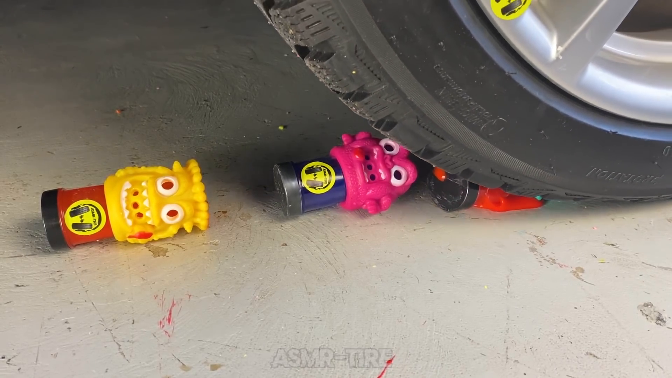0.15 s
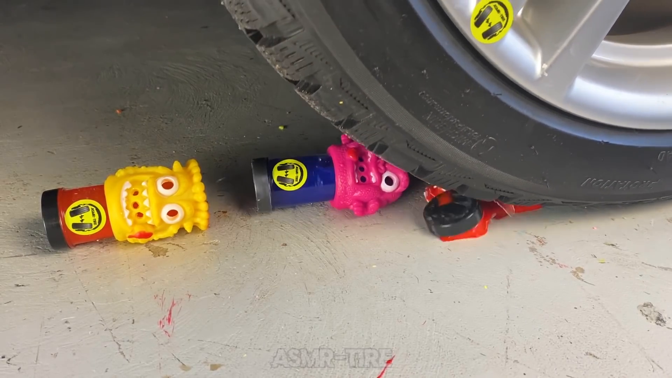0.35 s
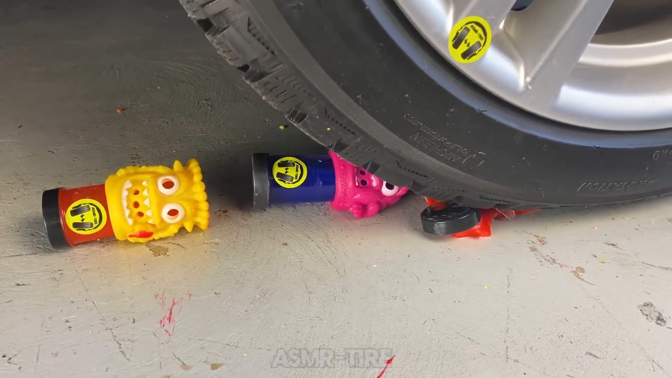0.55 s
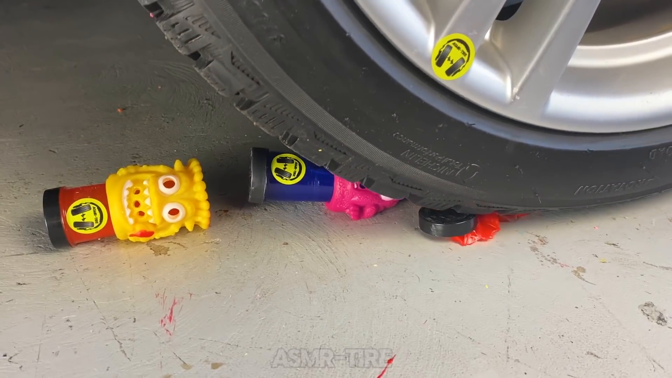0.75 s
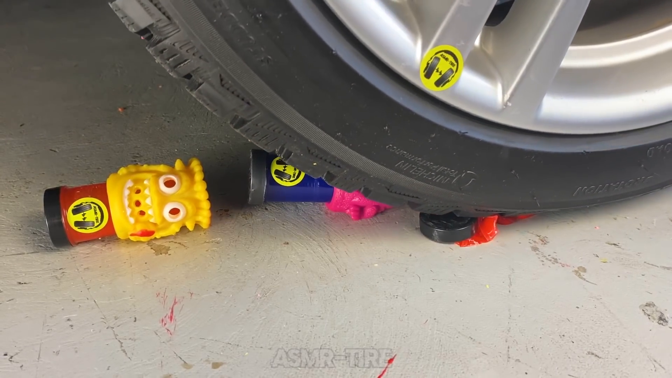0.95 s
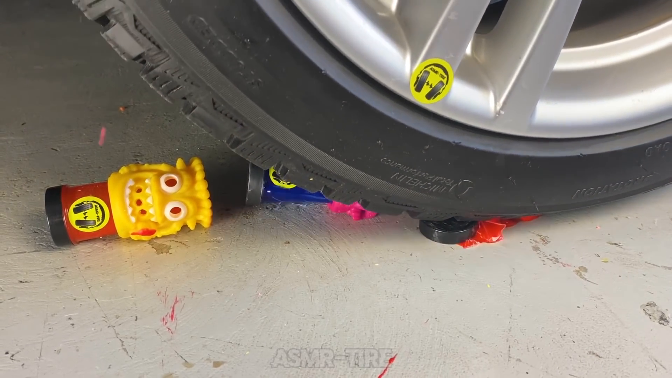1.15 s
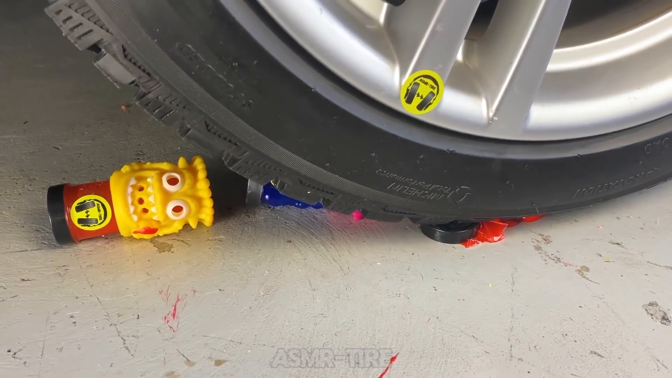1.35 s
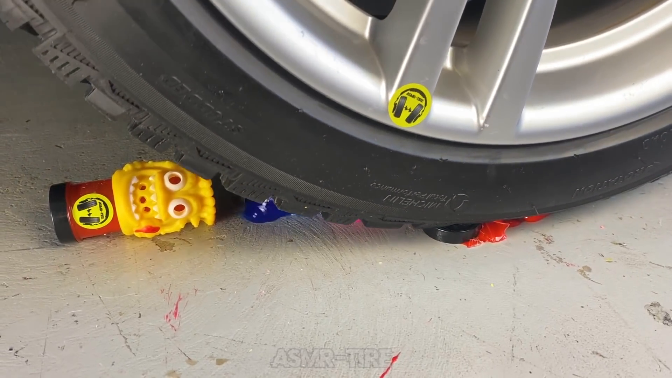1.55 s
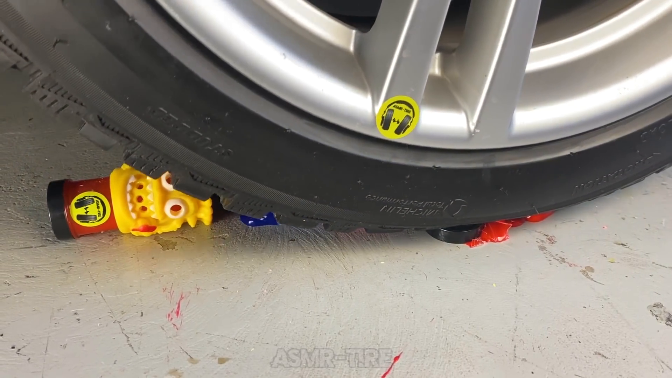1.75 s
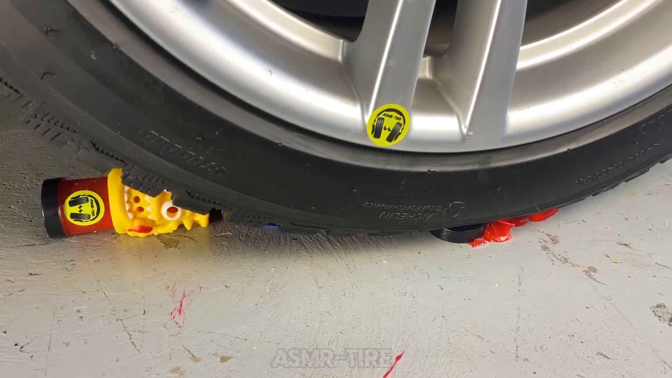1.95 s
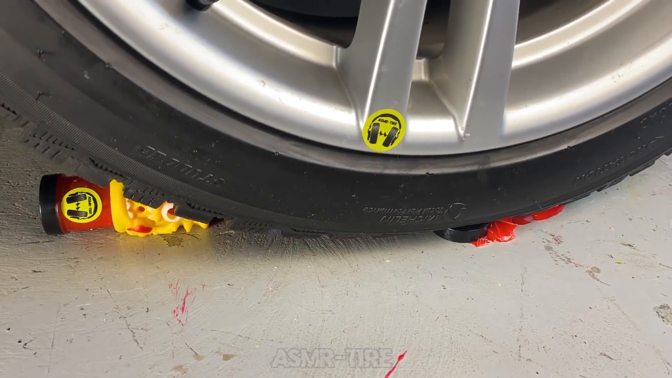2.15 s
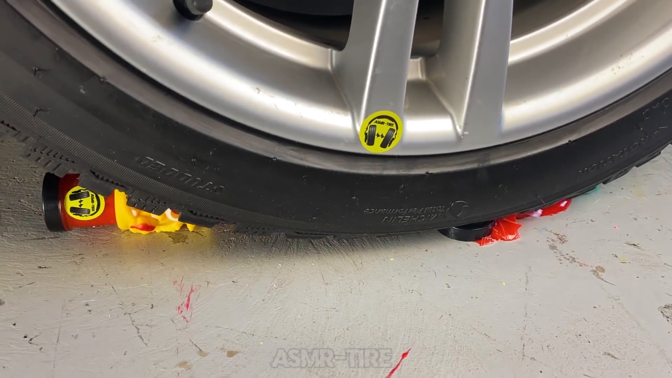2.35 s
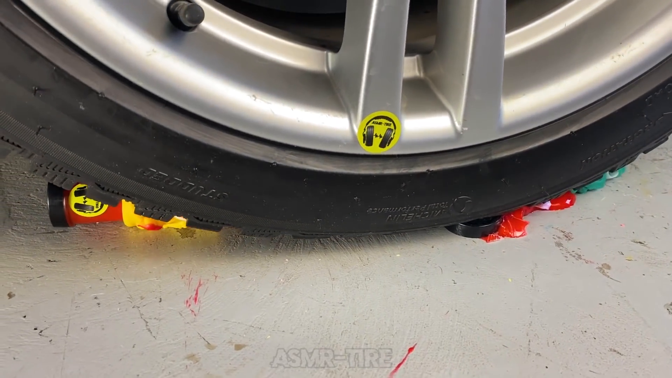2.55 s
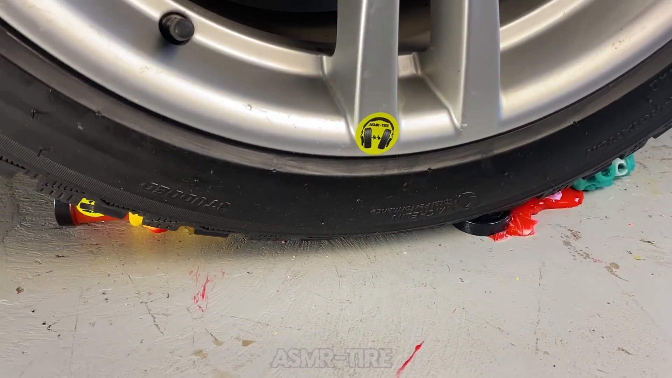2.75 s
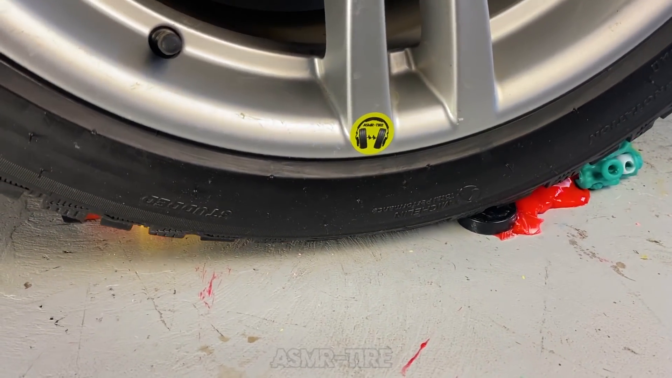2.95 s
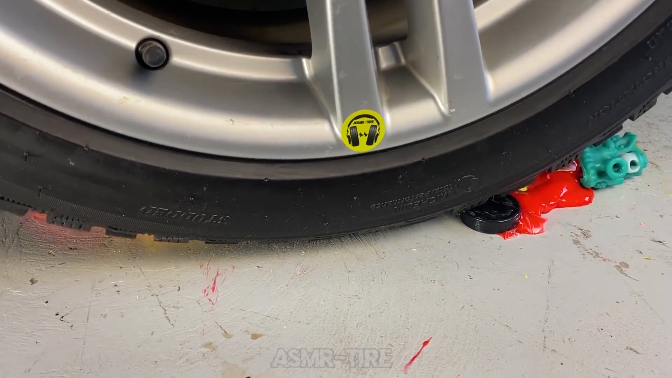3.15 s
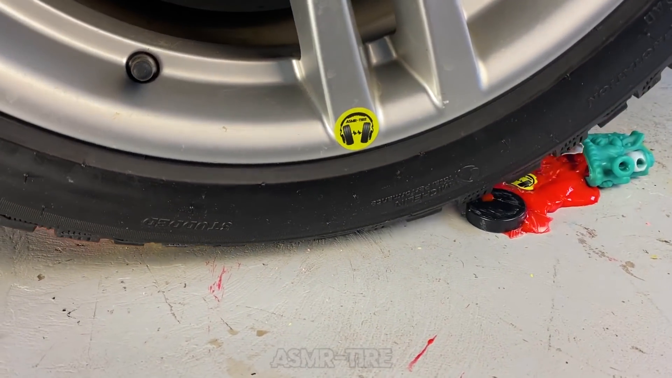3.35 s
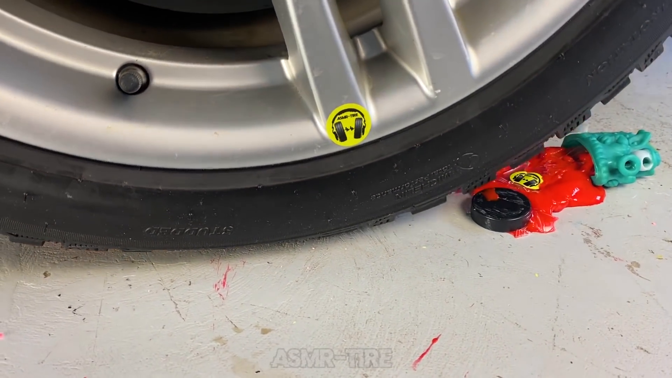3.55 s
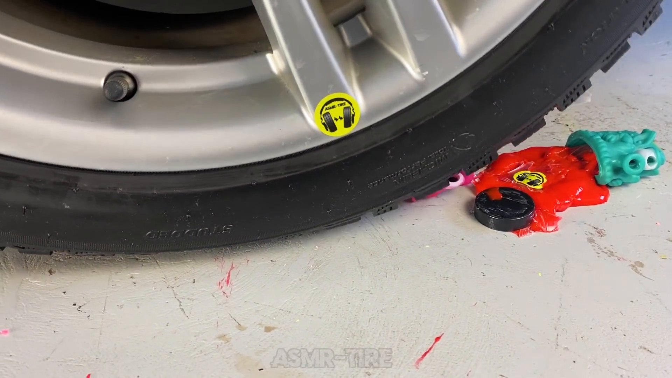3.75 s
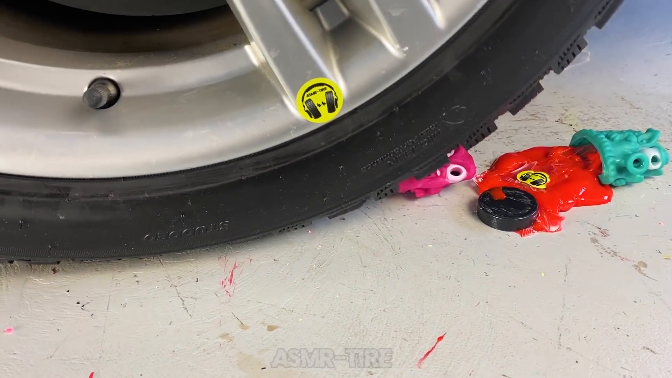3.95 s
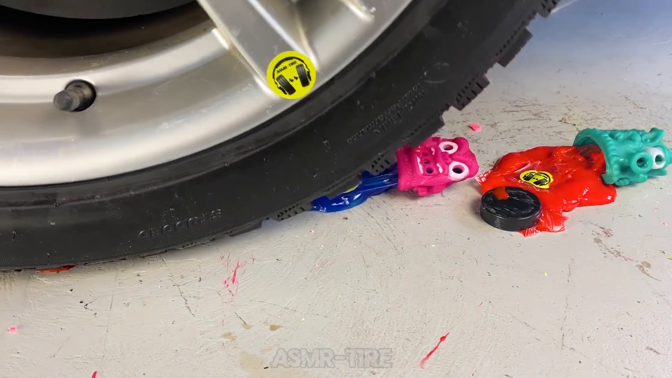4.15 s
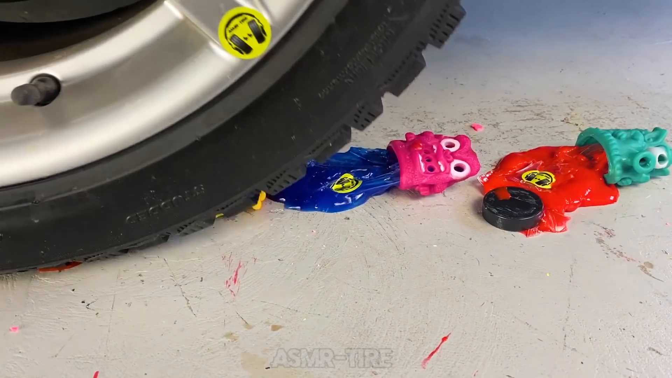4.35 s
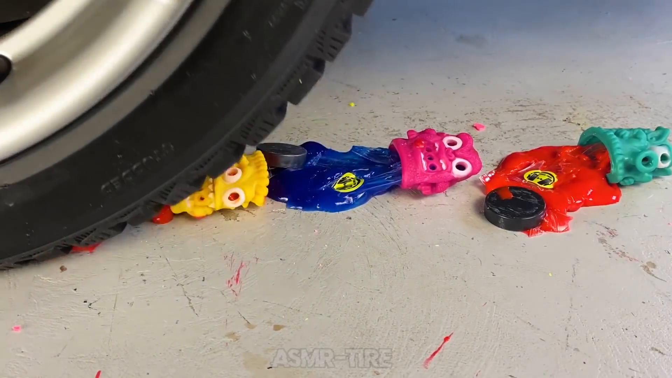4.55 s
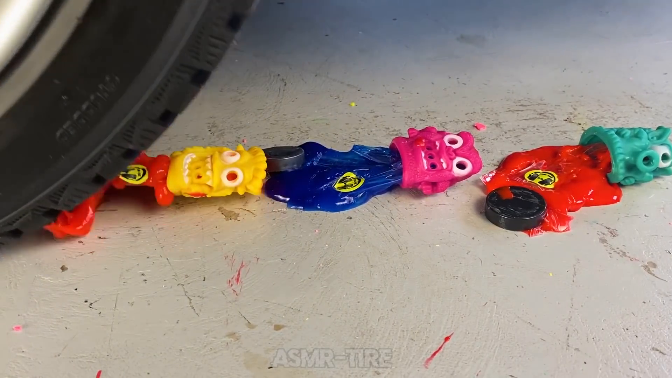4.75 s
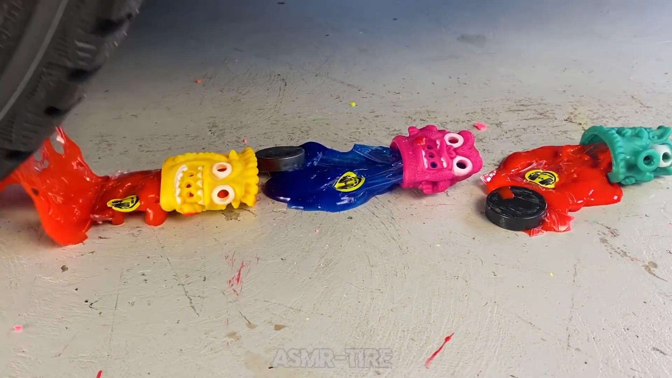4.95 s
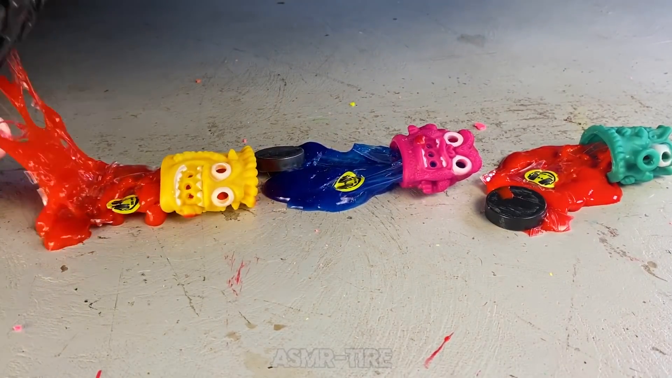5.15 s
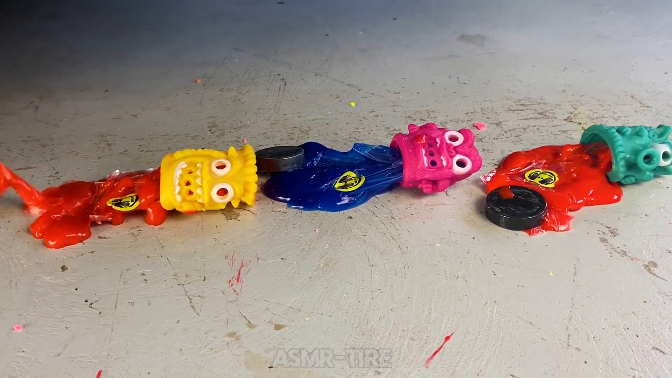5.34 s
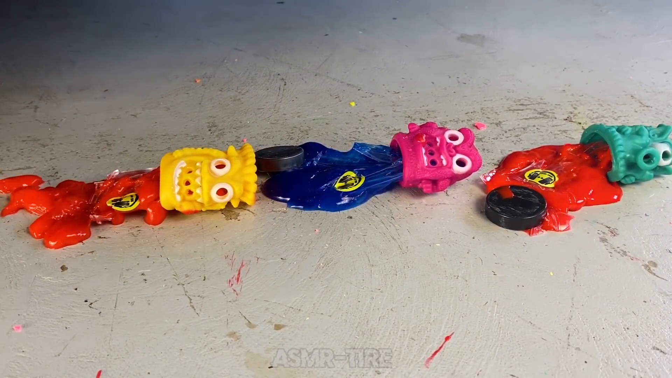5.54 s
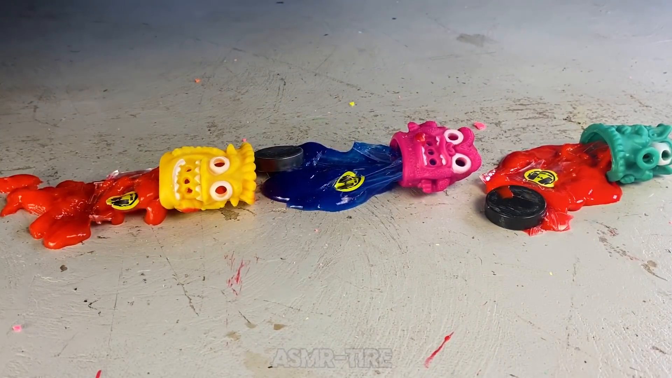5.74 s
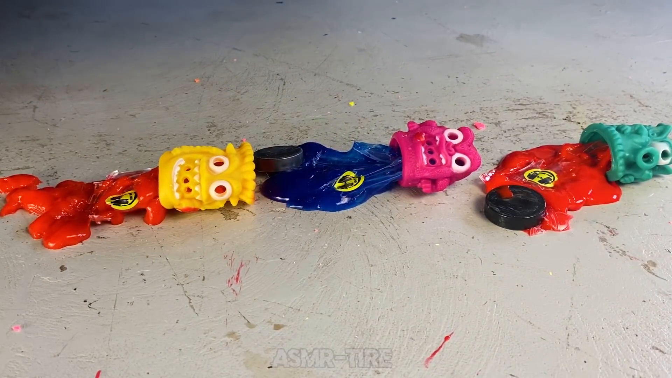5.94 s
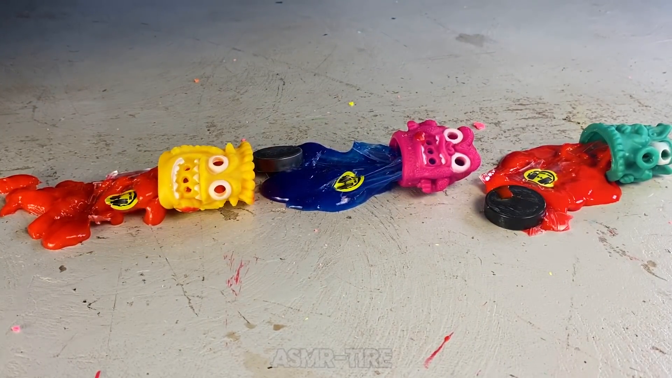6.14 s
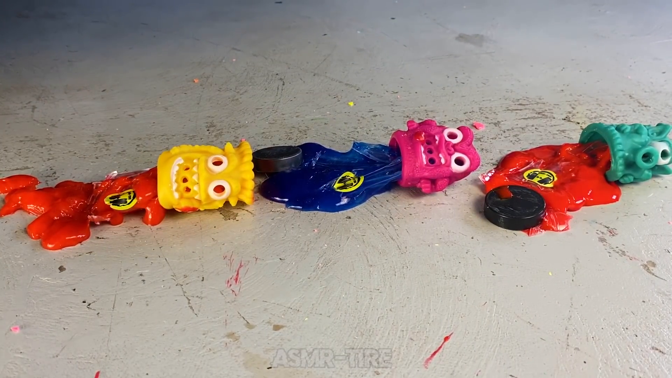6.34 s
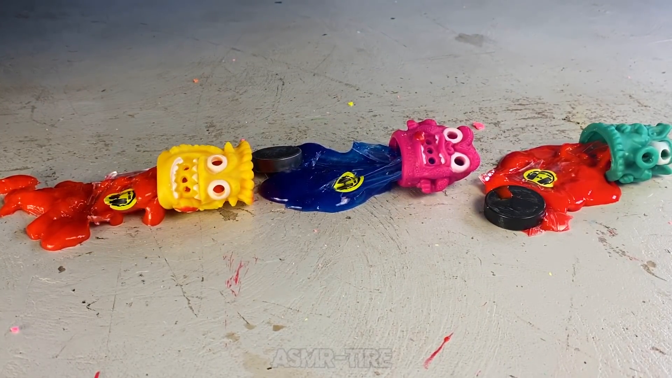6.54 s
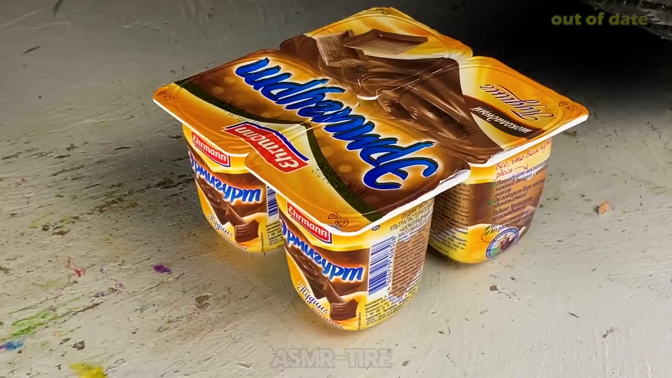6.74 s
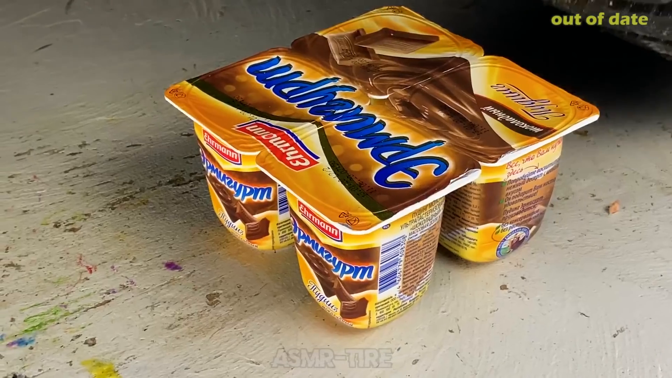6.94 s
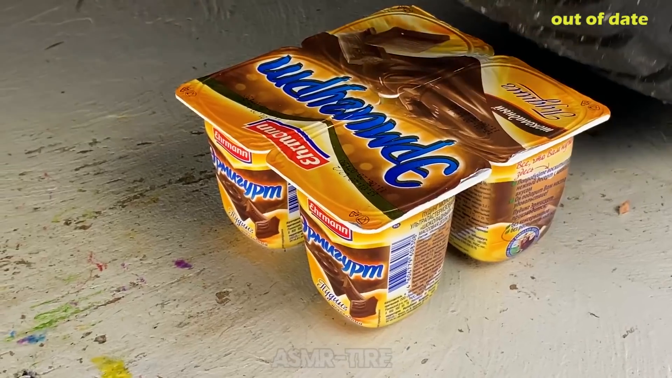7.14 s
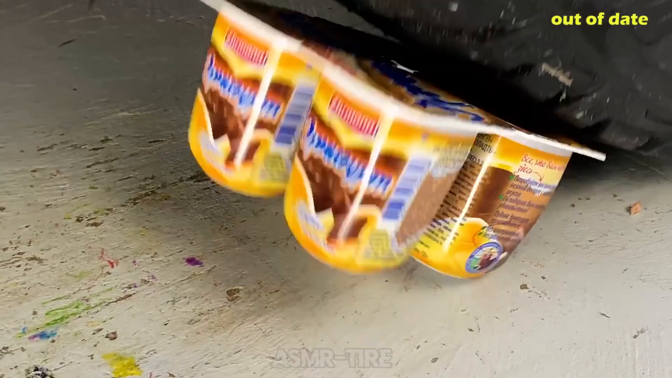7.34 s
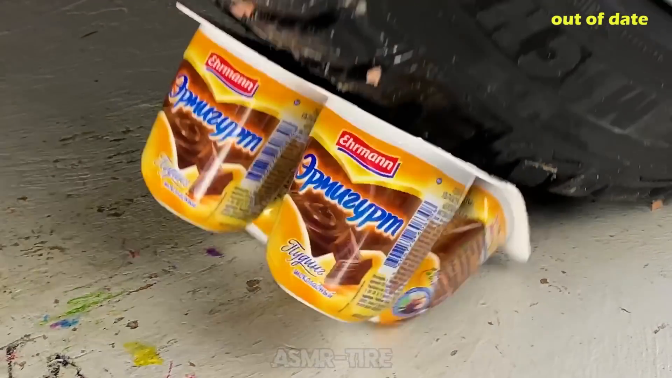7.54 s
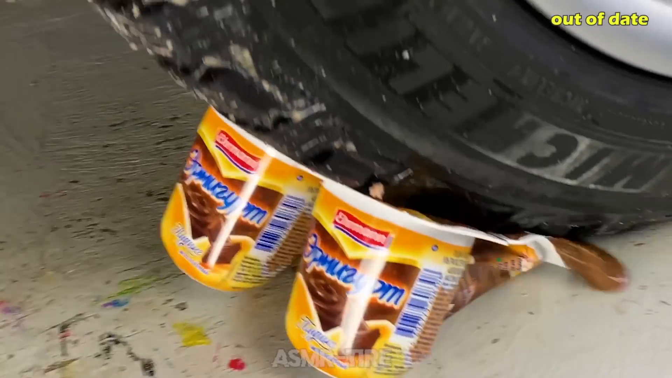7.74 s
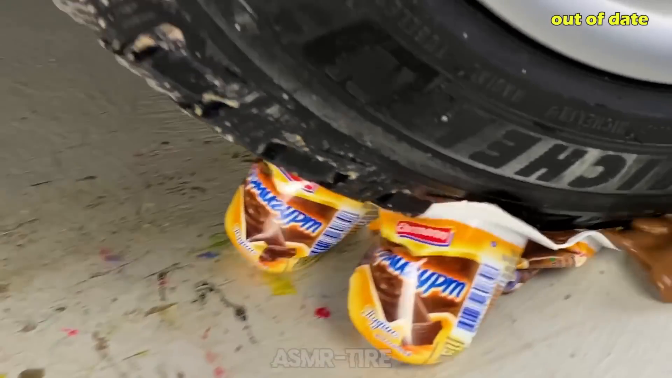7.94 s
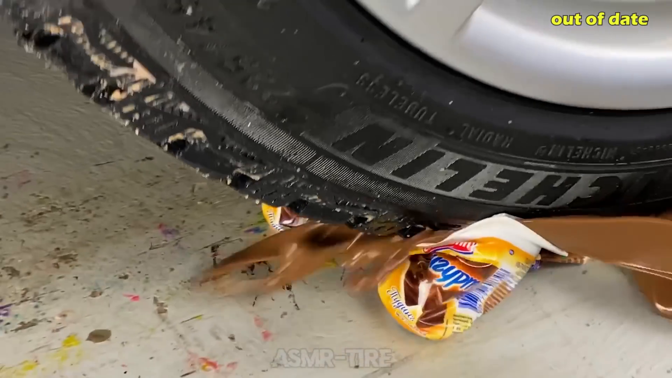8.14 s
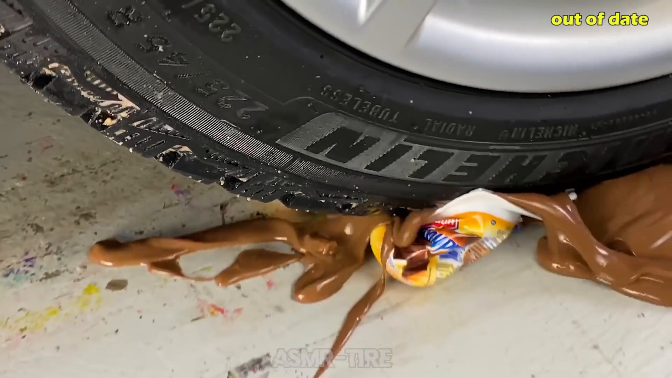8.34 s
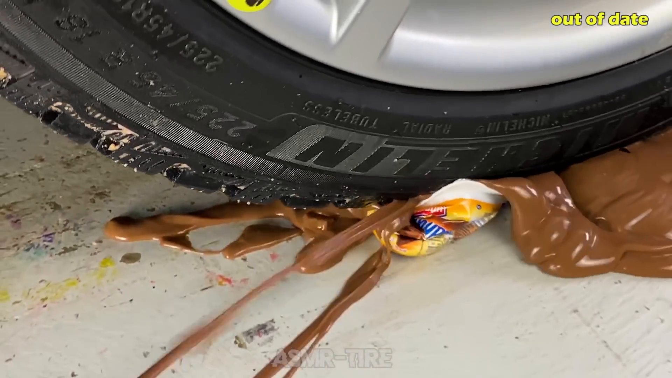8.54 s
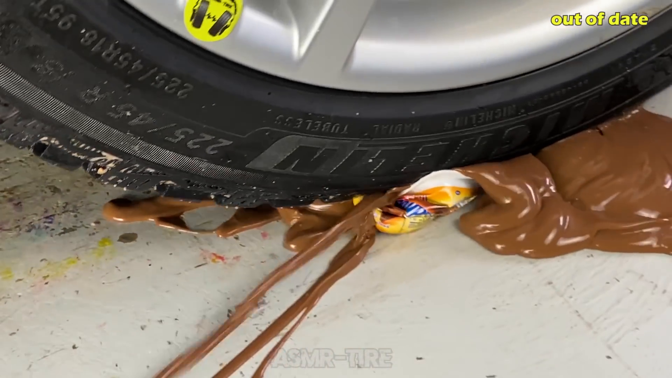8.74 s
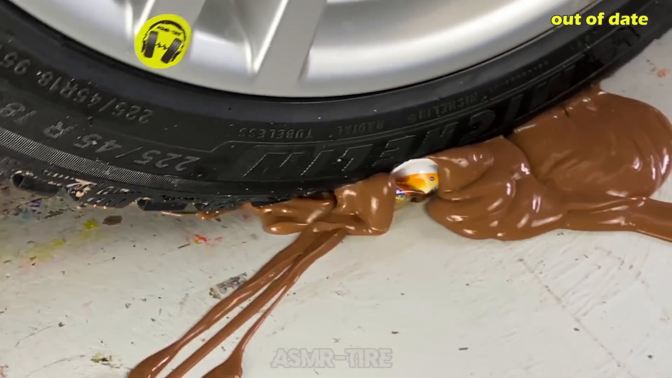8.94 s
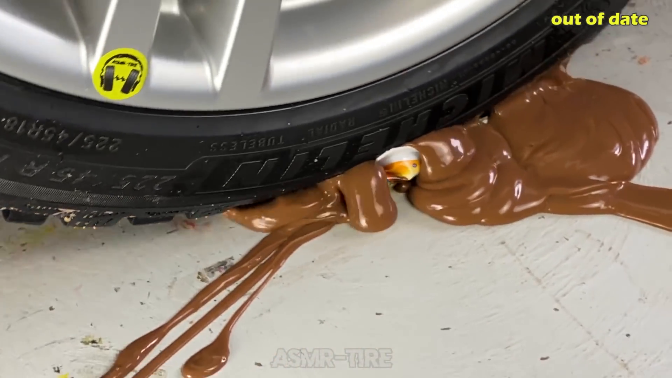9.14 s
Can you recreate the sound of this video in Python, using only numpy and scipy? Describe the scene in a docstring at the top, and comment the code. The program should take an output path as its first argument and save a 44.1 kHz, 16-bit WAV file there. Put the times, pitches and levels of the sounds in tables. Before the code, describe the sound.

A car engine idles with a low rumble and hum throughout, in a garage with a short echo. From the start, a tyre crushes hollow plastic toys close to the microphone: dense, irregular sharp cracks, splintering snaps and small hollow thumps, with brief rubbery groans near 1.1 and 3.9 seconds. The cracking thins after 4 seconds and ends in faint ticks by about 5.4, leaving the quiet engine. A soft low bump and two tiny squeaks come at 6.4 seconds. At 6.8 the engine is suddenly louder. From 7.3 seconds pudding cups crack and crinkle under the tyre, bursting with a loud pop at 7.7, when the engine drops back. More pops and the strongest wet squirt of cream follow around 8 seconds. The squirting fades into small spitting ticks by 8.8, and the engine idles softly until the end at about 9.3 seconds.

```python
"""Tyre crushing toys and pudding cups.

A car creeps over hollow plastic toys on a garage floor, then, from about 6.8 s, over pudding cups. Shells tear
and ping, hollows thump, the air in the tyre hums, cream squirts through a narrowing gap. The engine idles
behind; after the hardest bursts the whole background dips briefly and recovers."""
import sys
import numpy as np
from scipy import signal
from scipy.fft import rfft, irfft, next_fast_len
from scipy.io import wavfile
from scipy.ndimage import uniform_filter1d

SR = 44100
rng = np.random.default_rng(int(sys.argv[2]) if len(sys.argv) > 2 else 0)


def unload_audio(sound):
    """Save the sound as a 16-bit wav file, at the path given as the first command line argument."""
    columns = np.transpose(np.atleast_2d(sound))
    # keep every value between -1 and 1, then stretch to whole-number steps
    steps = np.round(np.clip(columns, -1, 1) * 32767)
    wavfile.write(sys.argv[1], SR, steps.astype(np.int16))


N = 409688
TIME_S = np.arange(N) / SR
EVENT_S = TIME_S[:SR // 14]
CUPS_START_S = 6.77


def undb(db):
    return 10 ** (np.asarray(db) / 20)


def band(x, lo_hz, hi_hz, order=2):
    return signal.sosfilt(signal.butter(order, [lo_hz, hi_hz], "band", fs=SR, output="sos"), x)


def noise_band(lo_hz, hi_hz, order=2):
    return band(rng.standard_normal(N), lo_hz, hi_hz, order)


def unit_rms(x):
    return x / np.sqrt(np.mean(x ** 2))


def unit_peak(x):
    return x / np.max(np.abs(x))


def fade(t, t60):
    """Exponential decay from t = 0, silent before."""
    return np.exp(-np.log(1000) * np.maximum(t, 0) / t60) * (t >= 0)


def arch(start_s, length_s):
    return np.clip(1 - (2 * (TIME_S - start_s) / length_s - 1) ** 2, 0, 1)


def wander(rate_hz):
    """Smoothed random steps, spread near 1."""
    hold = int(SR / rate_hz)
    steps = np.repeat(rng.standard_normal(N // hold + 1), hold)
    return uniform_filter1d(uniform_filter1d(steps, hold), hold)[:N]


def curves(table, outside=None):
    """One interpolated curve for each column after the time."""
    times_s, *columns = np.transpose(table)
    return [np.interp(TIME_S, times_s, column, left=outside, right=outside) for column in columns]


def add_at(out, start_s, sound):
    start = int(start_s * SR)
    out[start:start + len(sound)] += sound


def grains(per_s, centre_hz, spread_octaves, decay_cycles, scatter_db):
    """Short damped rings at random moments, scattered in pitch; rms 1."""
    when, pitch, strength = rng.random((int(per_s * N / SR), 3)).T
    starts, t = (when * N).astype(int), TIME_S[:SR // 100]
    hz = centre_hz[starts] * 2 ** (spread_octaves * (2 * pitch - 1))
    cycles = hz[:, None] * t
    gains = undb(-scatter_db * np.log(1 - strength))
    rings = gains[:, None] * np.sin(2 * np.pi * cycles) * np.exp(-cycles / decay_cycles)
    samples = starts[:, None] + np.arange(len(t))
    return unit_rms(np.bincount(samples.ravel(), rings.ravel())[:N])


# Each row: centre in Hz, relative level in dB, t60 in seconds.
GARAGE_BANDS = [(517, -35, 0.066), (1410, -28, 0.079), (4050, -22.5, 0.069), (9550, -26, 0.1)]
def garage_tail(dry):
    """Floor, car body and walls return a short diffuse tail that changes as the tyre rolls on."""
    block = SR // 5
    count = N // block + 1
    tails = np.zeros((count, block))
    for hz, db, t60 in GARAGE_BANDS:
        noise = unit_rms(band(rng.standard_normal((count, block)), hz / 1.91, hz * 2.2))
        tails += undb(db + 9) * fade(TIME_S[:block] - 0.002, t60) * noise / np.sqrt(t60 * SR / 14)
    blocks = np.pad(dry, (0, count * block - N)).reshape(count, block)
    wet = signal.fftconvolve(blocks, np.pad(tails, ((0, 0), (0, 1))), axes=1)
    return (wet[:, :block].ravel() + np.roll(wet[:, block:].ravel(), block))[:N]


# Each row: start in seconds, depth in dB, recovery time in seconds.
LEVEL_DIPS = [(0.291, 7.5, 0.24), (7.276, 6, 0.15), (7.691, 12, 0.053), (8.065, 5, 0.18)]
def dip_gain(fall_s=0.0043):
    """After the hardest bursts the level falls quickly and returns slowly."""
    dip_db = np.zeros(N)
    for start_s, depth_db, recovery_s in LEVEL_DIPS:
        age_s = np.maximum(TIME_S - start_s, 0)
        dip_db += depth_db * np.minimum(age_s / fall_s, 1) * np.exp(-(age_s / recovery_s) ** 2)
    return undb(-dip_db)


# Each row: multiple of the firing rate, relative level in dB with toys, with cups.
FIRING_HARMONICS = [(1, -6.5, -20), (2, -4.5, 2), (3, 1, -2.5), (4, 3.5, 2), (5, -2.5, -15),
                    (7, -20, -14.5), (9, -23.5, -9.5), (12, -16, -22)]
def engine_idle(firings):
    """Harmonics of the firing rate, each wavering slightly in level."""
    tones = np.zeros(N)
    for multiple, toys_db, cups_db in FIRING_HARMONICS:
        level_db = np.where(TIME_S < CUPS_START_S, toys_db, cups_db) + 1.8 * wander(6.4)
        tones += undb(level_db) * np.sin(2 * np.pi * (multiple * firings + rng.random()))
    return unit_rms(tones)


# Each row: frequency in Hz, relative spectral density in dB.
ROAR_SPECTRUM = [(150, -8), (250, -3.5), (291, -12.5), (398, -25), (434, -11), (1300, -14), (1830, -16),
                 (2710, -17), (3890, -22.5), (5000, -26), (6500, -53.5), (11000, -120)]
def engine_roar():
    """Broad engine bay noise with the whirr of belt and fan."""
    hz, db = np.transpose(ROAR_SPECTRUM)
    size = next_fast_len(N)
    bins_hz = np.maximum(np.arange(size // 2 + 1) * SR / size, 1)
    shape = undb(np.interp(np.log(bins_hz), np.log(hz), db, left=-90, right=-90))
    roar = unit_rms(irfft(rfft(rng.standard_normal(size)) * shape, size)[:N])
    whirr = band(roar, 1750, 2160, order=1)
    return roar + 1.2 * whirr


def tyre_air(hz=215.8, width_hz=16):
    """The engine keeps the air in the tyre humming near one note."""
    noise = unit_rms(noise_band(hz - width_hz / 2, hz + width_hz / 2, order=1))
    return unit_rms(noise + 2.1 * np.sin(2 * np.pi * hz * TIME_S + 1.2 * wander(12)))


def grit(per_s=250):
    """Grit and splinters tick under the tread."""
    impulses = (rng.random(N) < per_s / SR) * rng.standard_normal(N)
    impulses *= undb(3 * np.minimum(rng.exponential(size=N), 4))
    puff = rng.standard_normal(SR // 100) * fade(TIME_S[:SR // 100], t60=0.0053)
    return unit_rms(band(signal.fftconvolve(impulses, puff)[:N], 1300, 8000, order=1))


# Each row: start in seconds, length in seconds, hum level in dB, roar gain in dB.
TREAD_GRINDS = [(0.45, 0.28, -37.5, 8), (1.23, 0.092, -39, 4.5), (2.06, 0.21, -49, 5),
                (2.494, 0.28, -41.5, 1), (3.197, 0.27, -41.5, -1.5), (3.477, 0.2, -48, 0.5),
                (7.02, 0.15, -39.5, 1.5)]
def tread_grinds(rise_s=0.036, t60=0.45):
    """The grinding tread sets the tyre air humming and shifts the level of the roar."""
    hum_gain, roar_gain_db = np.zeros((2, N))
    for start_s, length_s, hum_db, gain_db in TREAD_GRINDS:
        age_s = TIME_S - start_s
        envelope = np.clip(age_s / rise_s, 0, 1) * fade(np.maximum(age_s - length_s, 0), t60)
        hum_gain += undb(hum_db) * envelope
        roar_gain_db += gain_db * envelope
    return hum_gain, roar_gain_db


# Each row: time in seconds, firing rate in Hz.
FIRING_RATE = [(0, 23.76), (6.765, 23.84), (6.775, 25.48), (9.29, 25.81)]
# Each row: time in seconds, then idle, rumble, roar and hiss levels in dB.
CAR_LEVELS = [(0.0, -48, -45.5, -50, -75), (0.26, -42.5, -39, -38.5, -52.5),
              (0.75, -38.5, -43, -51.5, -62.5), (1.15, -53.5, -42, -46.5, -59),
              (2.1, -49, -47.5, -51, -59.5), (2.4, -46.5, -53.5, -53, -70), (2.6, -49.5, -52, -44, -60.5),
              (3.4, -50.5, -52, -43.5, -58.5), (4.0, -49, -49, -48.5, -66), (4.5, -47, -52, -54, -72.5),
              (4.7, -46, -54.5, -60.5, -76.5), (6.3, -46.5, -53.5, -65.5, -100),
              (6.763, -43, -50, -63.5, -88.5), (6.772, -32, -35, -49, -63.5),
              (7.25, -35, -36, -45.5, -57.5), (7.45, -26, -32, -41.5, -55), (7.691, -27.5, -35, -42, -47),
              (7.705, -52, -63, -78, -73), (8.0, -51, -66, -47, -49.5), (8.3, -43.5, -49, -52, -60.5),
              (9.1, -44, -50.5, -63, -81), (9.29, -42.5, -51, -58, -61.5)]
def car():
    """The idling car rolls on, shaking body and floor; valves and exhaust pulse once a firing."""
    idle_db, rumble_db, roar_db, hiss_db = curves(CAR_LEVELS)
    firing_hz, = curves(FIRING_RATE)
    grind_hum, grind_db = tread_grinds()
    firings = np.cumsum(firing_hz * (1 + 0.0067 * wander(3.2))) / SR
    idle = undb(idle_db) * engine_idle(firings)
    rumble = undb(rumble_db + 2.9 * wander(16)) * unit_rms(noise_band(64, 125, order=1))
    roar = engine_roar()
    hiss = unit_rms(noise_band(6000, 15000, order=1) + 0.77 * noise_band(3700, 7000))
    steady_hum = undb(rumble_db + np.where(TIME_S < CUPS_START_S, -6, -11))
    hum = (steady_hum + grind_hum) * tyre_air()
    roar *= undb(roar_db + grind_db + 2 * wander(30))
    hiss *= undb(hiss_db + 3.2 * wander(37))
    throb = 1 + 0.21 * np.sin(2 * np.pi * firings)
    return idle + rumble + throb * (roar + hiss) + hum + undb(hiss_db - 1) * grit()


def rocking_bump(start_s=6.375, level_db=-36, start_hz=98.3):
    """The car rocks with a soft low bump that sinks in pitch."""
    age_s = np.maximum(TIME_S - start_s, 0)
    envelope = unit_peak(age_s * np.exp(-age_s / 0.026))
    return undb(level_db) * envelope * np.sin(2 * np.pi * start_hz * age_s * (1 - 1.45 * age_s))


# Each row: frequency in Hz, relative level in dB.
SQUEAK_PARTIALS = [(2150, 0.5), (5700, -18), (6900, -20)]
# Each row: start in seconds, level in dB.
RUBBER_SQUEAKS = [(6.354, -50.5), (6.379, -50)]
def rubber_squeaks(length_s=0.017):
    """Rubber gives two wavering squeaks as the car rocks."""
    tone = sum(undb(db) * np.sin(2 * np.pi * hz * TIME_S + 1.9 * wander(400))
               for hz, db in SQUEAK_PARTIALS)
    return tone * sum(undb(db) * np.sqrt(arch(start_s, length_s)) for start_s, db in RUBBER_SQUEAKS)


# Each row: start in seconds, level in dB.
LID_SLIPS = [(7.678, -18), (7.6797, -13.5), (7.6838, -11)]
def lid_creaks(hz=1135, length_s=0.004):
    """The foil lid creaks in quick, growing slips before it bursts."""
    return sum(undb(db) * arch(start_s, length_s) * np.sin(2 * np.pi * hz * (TIME_S - start_s))
               for start_s, db in LID_SLIPS)


# Each row: time in seconds, level in dB.
CRINKLE_LEVELS = [(7.4, -52), (7.56, -62), (7.69, -34), (7.7, -75), (7.94, -67), (7.975, -35), (8.015, -53),
                  (8.022, -72), (8.05, -39), (8.1, -72)]
def cup_crinkle():
    """Thin cup walls crumple in dense, ragged little buckles."""
    level_db, = curves(CRINKLE_LEVELS, outside=-120)
    buckles = grains(900, np.full(N, 4200.), spread_octaves=1.1, decay_cycles=2.2, scatter_db=2.6)
    return undb(level_db) * buckles


# Each row: time in seconds, squirt level in dB, gap resonance in Hz, sizzle level in dB.
CREAM_FLOW = [(7.38, -70, 589.4, -82), (7.45, -36, 651, -72), (7.559, -33, 680, -58),
              (7.68, -32, 1000, -46), (7.704, -46, 950, -72), (7.8, -46.5, 884.5, -63),
              (7.93, -40, 929, -55), (7.965, -41, 1253, -43.5), (7.98, -23.5, 1302, -47),
              (8.015, -39.5, 1257, -39), (8.025, -44, 1245, -61), (8.071, -47, 1097, -63),
              (8.27, -40, 1245, -68), (8.45, -46, 1653, -82), (8.75, -61, 1300, -85)]
def cream_squirt():
    """Cream forced through a narrowing gap: noise and bubbles near its resonance, sizzle on top."""
    squirt_db, gap_hz, sizzle_db = curves(CREAM_FLOW, outside=-120)
    low_noise = signal.sosfilt(signal.butter(1, 330, fs=SR, output="sos"), rng.standard_normal((2, N)))
    phase = 2 * np.pi * np.cumsum(gap_hz) / SR
    flow = unit_rms(low_noise[0] * np.cos(phase) + low_noise[1] * np.sin(phase))
    bubbles = grains(700, np.maximum(gap_hz, 300), spread_octaves=0.65, decay_cycles=4, scatter_db=2.8)
    squirt = undb(squirt_db + 1.6 * wander(60)) * unit_rms(0.74 * flow + bubbles)
    sizzle = undb(sizzle_db + 3.4 * wander(150)) * unit_rms(noise_band(11500, 15300))
    return squirt + sizzle


# Each row: start in seconds, peak in dB, centre in Hz.
SMALL_TICKS = [(0.358, -31.5, 3880), (1.176, -31, 2600), (1.237, -43, 1700), (1.545, -21, 9960),
               (1.727, -31, 4660), (2.359, -27.5, 8900), (2.5208, -7, 14500), (2.531, -26, 3040),
               (2.7164, -17, 6660), (2.786, -28, 5000), (2.967, -35, 9000), (3.027, -24, 4440),
               (3.072, -14, 10000), (3.096, -43, 9000), (3.1688, -14, 5840), (3.358, -28, 4400),
               (3.37, -31, 7000), (3.3982, -29, 2440), (3.5394, -27.5, 3310), (3.627, -26, 1390),
               (3.837, -21, 5660), (3.863, -29, 4800), (4.2557, -32, 4480), (4.175, -45, 9500),
               (4.191, -40, 8000), (4.198, -37, 4450), (4.25, -38, 9000), (4.326, -44, 5000),
               (4.365, -43, 7000), (4.381, -44, 9600), (4.647, -46, 8500), (4.41, -36, 4500),
               (4.4252, -40, 4700), (4.469, -42, 1000), (4.578, -39, 1000), (5.077, -44, 3940),
               (5.357, -48, 3900), (5.371, -38, 1900), (7.479, -29.5, 3100), (7.522, -19, 14000),
               (7.5768, -26, 3040), (7.611, -34, 5770), (7.746, -43, 3080), (8.003, -4.5, 13500),
               (8.0063, -12, 9400), (8.1657, -29.5, 3260), (8.1925, -25.5, 6570), (8.464, -36, 10180),
               (8.5317, -16.5, 8800), (8.544, -23, 6950), (8.6022, -23, 6660), (8.612, -24, 6700),
               (8.7668, -32, 10100), (8.829, -41, 10000)]
def small_ticks():
    """Splinters, slime, foil and spitting cream tick in puffs of noise; low, wet ones are narrower."""
    out = np.zeros(N)
    envelope = fade(TIME_S[:SR // 30], t60=0.0053)
    for start_s, db, hz in SMALL_TICKS:
        puff = envelope * rng.standard_normal(len(envelope))
        tick = band(puff, hz / 1.14, hz * 1.15, order=1 if hz > 4200 else 2)
        add_at(out, start_s, undb(db) * unit_peak(tick))
    return out


# Each row: start in seconds, peak in dB, starting pitch in Hz, time in seconds to fall by fall_octaves.
WALL_GROANS = [(1.135, -14, 474, 0.015), (3.296, -29.5, 762, 0.037), (3.878, -16.5, 588, 0.02),
               (3.911, -26.5, 320, 0.024)]
def wall_groans(fall_octaves=1.6):
    """Squashed rubbery walls groan raggedly downward."""
    out, t = np.zeros(N), EVENT_S
    for start_s, db, hz, fall_s in WALL_GROANS:
        fall_rate = fall_octaves * np.log(2) / fall_s
        jitter = 0.015 * np.cumsum(rng.standard_normal(len(t)))
        cycles = hz / fall_rate * (1 - np.exp(-fall_rate * t)) + jitter
        groan = np.sqrt(t) * fade(t, 2 * fall_s) * np.sin(2 * np.pi * cycles)
        add_at(out, start_s, undb(db) * unit_peak(groan))
    return out


# Each row: start in seconds, peak in dB, rise time in seconds.
AIR_THUMPS = [(0.254, -36, 0.0022), (0.274, -10, 0.0049), (0.732, -19.5, 0.0018), (1.324, -19, 0.0025),
              (1.476, -23, .0022), (1.634, -26, 0.0032), (2.081, -19, 0.0023), (2.48, -23, 0.0029),
              (2.548, -21.5, 0.0022), (2.633, -16, 0.0024), (2.758, -25, 0.0027), (2.913, -16.5, 0.0031),
              (2.985, -35, 0.0032), (3.18, -29, 0.0034), (3.204, -21.5, 0.0057), (3.435, -14.5, 0.0064),
              (7.687, -17.5, 0.0034), (7.947, -20.5, 0.0029), (8.044, -28.5, 0.0023)]
def air_thumps(floor_hz=40, sweep_hz=420, fall_s=0.0046):
    """Air squeezed from a collapsing hollow thumps, falling in pitch."""
    out, t = np.zeros(N), EVENT_S
    cycles = floor_hz * t + sweep_hz * fall_s * (1 - np.exp(-t / fall_s))
    for start_s, db, rise_s in AIR_THUMPS:
        thump = t * np.exp(-t / rise_s) * np.sin(2 * np.pi * cycles)
        add_at(out, start_s, undb(db) * unit_peak(thump))
    return out


# Each row: frequency ratio, relative level in dB, t60 in seconds.
SHELL_MODES = [(1.0, 0, .008), (1.9, -3, .006)]
def shell_ping(age_s, nominal_hz, sag_s=0.005):
    """The released shell rings for a few cycles, ever slower as it slackens."""
    cycles = 1.393 * nominal_hz * sag_s * (1 - np.exp(-age_s / sag_s))
    ring = np.zeros(len(age_s))
    for ratio, db, t60 in SHELL_MODES:
        scatter = rng.standard_normal()
        mode = np.sin(2 * np.pi * ratio * (1 + 0.051 * scatter) * cycles)
        ring += undb(db + 0.97 * scatter) * fade(age_s, t60) * mode
    return unit_peak(ring * np.minimum(age_s / 0.0023, 1))


# Each row: start in seconds, snap peak in dB, splinter treble in dB relative to the snap,
# nominal shell pitch in Hz, shell peak in dB.
SHELL_CRACKS = [(0.0178, -20, -6, 1784, -13), (0.1056, -14, 1, 1660, -10), (0.176, -19, 3.5, 1950, -29.5),
                (0.2208, -35, 2, 730, -17), (0.2557, -23, -3.5, 742, -17), (0.271, -7.5, 0.5, 522, -8.5),
                (0.2748, -5.5, -14.5, 775, -7), (0.3404, -26, -3, 1880, -28),
                (0.5206, -35.5, -13, 1770, -21.5), (0.546, -28, -11, 910, -19),
                (0.557, -14.5, -3.5, 930, -18), (0.572, -19.5, -9, 940, -16.5),
                (0.5887, -25, -14, 840, -17.5), (0.595, -26, -19, 1830, -13.5),
                (0.6126, -18.5, -10, 860, -13.5), (0.6416, -17.5, -28, 1540, -13.5),
                (0.7329, -11, -20, 1620, -12), (0.752, -13, -4.5, 1470, -23.5),
                (0.7881, -30.5, 13.5, 1580, -14.5), (0.795, -10.5, -48, 1730, -7.5),
                (0.827, -20.5, -21, 1620, -33), (0.8715, -7.5, -1.5, 1410, -15.5),
                (1.0384, -6, -1.5, 1014, -7.5), (1.059, -14, -28.5, 1890, -36),
                (1.095, -17, 1.5, 1910, -27), (1.133, -6.5, -0.5, 890, -9.5), (1.323, -7.5, 2, 1800, -7.5),
                (1.3556, -20, 1, 1820, -22.5), (1.4007, -14.5, 1.5, 1410, -15.5),
                (1.479, -7.5, 4, 1096, -6), (1.4968, -20, -20, 1630, -13.5),
                (1.558, -32, 11.5, 1620, -19.5), (1.5826, -8.5, -1.5, 1110, -7.5),
                (1.6326, -12.5, 7.5, 870, -23.5), (1.6453, -21.5, -8.5, 1280, -16),
                (1.7492, -12.5, -1.5, 1390, -21), (1.8102, -21.5, -5, 1440, -31),
                (1.9107, -8, -6.5, 1070, -13), (1.961, -9, -6, 1030, -14.5),
                (1.9752, -13.5, -5, 1430, -11.5), (2.0403, -14.5, -6, 1470, -27), (2.08, -6, -8, 1560, -15),
                (2.1204, -15, -9, 1010, -22), (2.1397, -13.5, 0.5, 1220, -19),
                (2.177, -18, -33, 1290, -14.5), (2.4791, -9.5, 1, 877, -6.5),
                (2.4925, -13, 2.5, 1004, -35.5), (2.5417, -20.5, 11.5, 1140, -23),
                (2.5478, -12, -2, 1760, -9), (2.606, -7.5, -1.5, 1000, -11), (2.6299, -10, 0, 1620, -12),
                (2.6357, -10, -5, 1025, -10.5), (2.744, -5.5, -4, 1890, -22), (2.758, -12, -4.5, 1620, -11),
                (2.816, -24.5, -8, 1050, -35), (2.875, -12.5, 0, 1810, -36.5), (2.9, -22.5, -5, 1060, -30),
                (2.914, -14.5, 1.5, 1066, -8), (2.9543, -10, -7.5, 1140, -10.5),
                (2.9854, -10, -2.5, 1220, -13), (3.0125, -19.5, -1, 2200, -34),
                (3.106, -23.5, -7.5, 1600, -21), (3.181, -10.5, 0.5, 920, -13), (3.203, -8, -1, 880, -9.5),
                (3.2937, -22, -11, 650, -20), (3.413, -20.5, -8, 1190, -25), (3.427, -22, -12, 910, -26.5),
                (3.434, -7, -6.5, 458, -10), (3.505, -14, -6, 1164, -17), (3.593, -10.5, -7.5, 1960, -27),
                (3.648, -15.5, -8, 1013, -7.5), (3.702, -17, -2, 1990, -14.5), (3.7626, -15, 3.5, 920, -17),
                (3.878, -7, -2.5, 730, -11.5), (3.9552, -16.5, -7, 865, -19), (4.0634, -34, -7, 1000, -18),
                (4.294, -22, -4.5, 1120, -18.5), (4.344, -23, -16, 1530, -27),
                (4.3893, -23, -14, 1210, -28), (4.44, -19.5, -3.5, 2090, -32), (4.489, -40, -12, 746, -33),
                (4.503, -37, -16, 910, -33), (4.872, -36, -8, 1040, -31.5), (4.896, -23.5, -4.5, 1340, -47),
                (7.257, -12, -10, 1870, -6.5), (7.258, -31, -13, 594, -13), (7.41, -27.5, -21, 2180, -26),
                (7.5402, -20.5, -6, 620, -27), (7.594, -29, 8, 630, -29), (7.635, -9.5, -9, 920, -8.5),
                (7.66, -15, -23, 633, -10.5), (7.687, -17.5, -2, 950, -2), (7.833, -20.5, -25, 880, -17),
                (7.9471, -15, 1, 1010, -9.5), (7.974, -28.5, -12, 1240, -23), (8.0423, -9.5, -7, 1380, -8),
                (8.0552, -30.5, -20, 1320, -18.5)]
def shell_cracks():
    """A plastic wall tears in a short rough burst; as it lets go, the shell pings."""
    out, t = np.zeros(N), EVENT_S
    noises = rng.standard_normal((len(SHELL_CRACKS), len(t)))
    for (start_s, snap_db, treble_db, hz, shell_db), noise in zip(SHELL_CRACKS, noises):
        tear_s = 0.001958 * undb(0.3 * (snap_db + 15.5))  # bigger breaks tear longer
        burst = noise * np.minimum(t / 0.00099, 1) * fade(np.maximum(t - tear_s, 0), t60=0.0055)
        snap = unit_peak(band(burst, 1000, 7130))
        splinters = undb(treble_db) * unit_peak(band(burst, 5150, 14680))
        ping = shell_ping(np.maximum(t - 0.601 * tear_s, 0), hz)
        shell = unit_peak(ping + 0.9 * unit_peak(band(burst, hz / 2.43, hz * 1.41)))
        add_at(out, start_s, undb(snap_db) * (snap + splinters) + undb(shell_db) * shell)
    return out


def scene():
    """Crushing up close, in mono; the garage tail and the car dip together behind it."""
    close = shell_cracks() + air_thumps() + wall_groans() + small_ticks()
    close += cream_squirt() + cup_crinkle() + lid_creaks() + rubber_squeaks() + rocking_bump()
    return (close + dip_gain() * (garage_tail(close) + car()))[None]


# Each row: centre in Hz, width in Hz, depth from 0 to 1.
NOTCHES = [(8360, 1120, 0.65), (540, 41, 0.4)]
def record(dry):
    """The sound has its loudest peaks rounded, a few narrow dips, and no deep bass or top treble."""
    rounded = np.tanh(1.245 * dry) / 1.324
    out = signal.sosfilt(signal.butter(2, 30, "high", fs=SR, output="sos"), rounded)
    for hz, width_hz, depth in NOTCHES:
        out = out - depth * signal.lfilter(*signal.iirpeak(hz, hz / width_hz, SR), out)
    out = signal.sosfilt(signal.butter(2, [11300, 12700], "bandstop", fs=SR, output="sos"), out)
    out = signal.sosfilt(signal.ellip(6, 0.3, 30, 15500, fs=SR, output="sos"), out)
    return signal.sosfilt(signal.ellip(10, 0.2, 80, 16750, fs=SR, output="sos"), out)


dry = scene()
out = record(dry)
unload_audio(out)
```